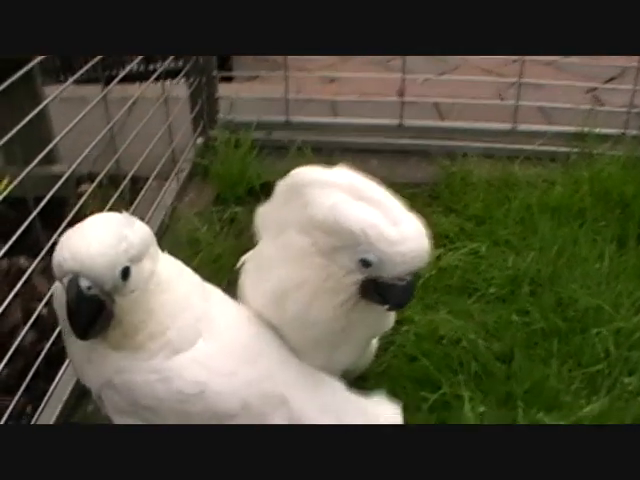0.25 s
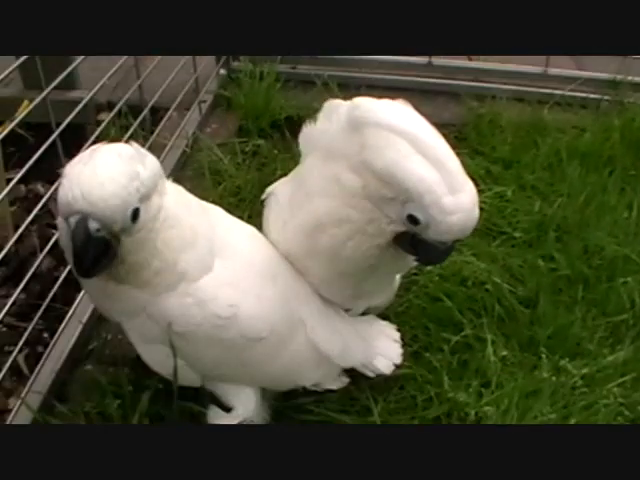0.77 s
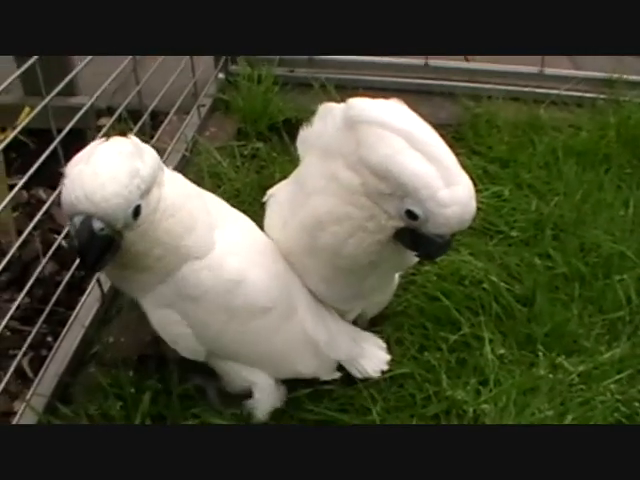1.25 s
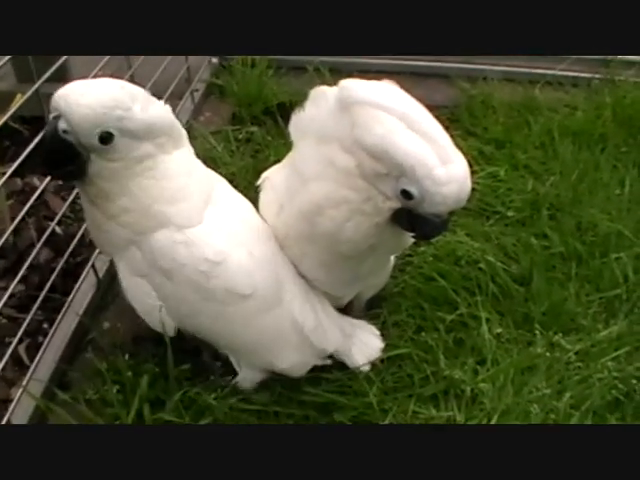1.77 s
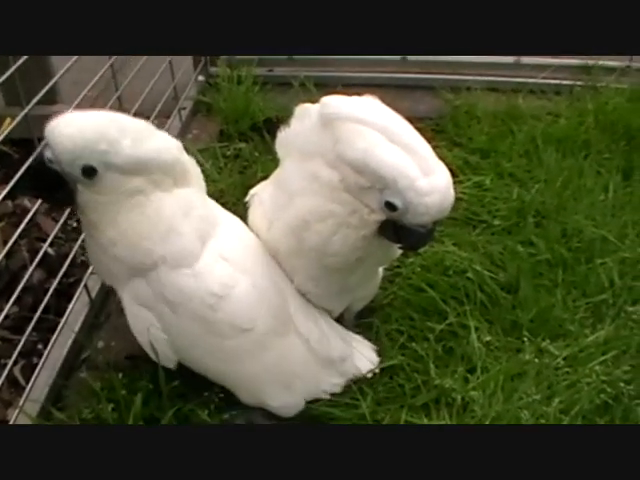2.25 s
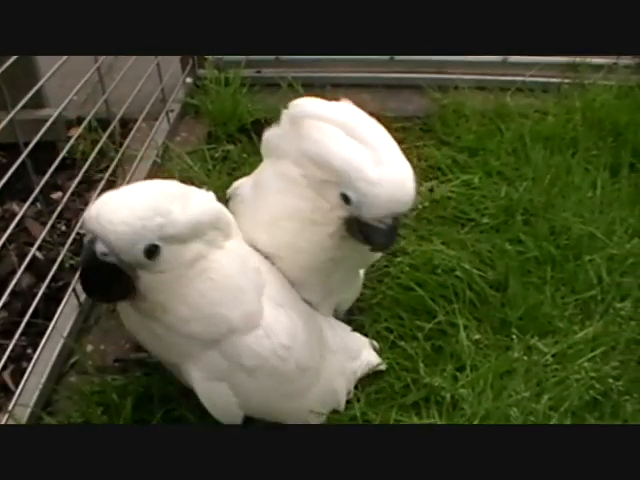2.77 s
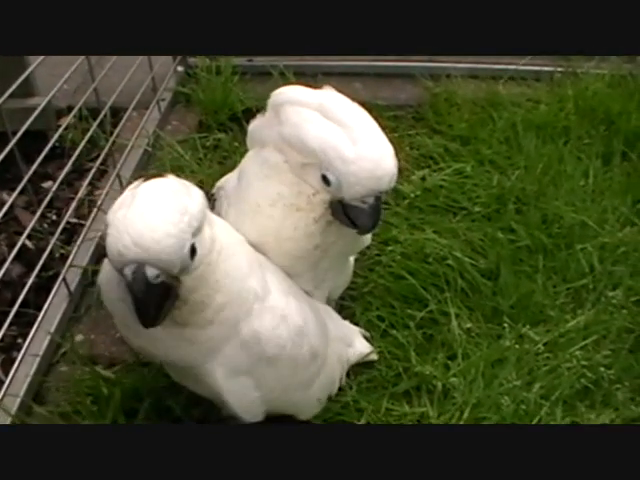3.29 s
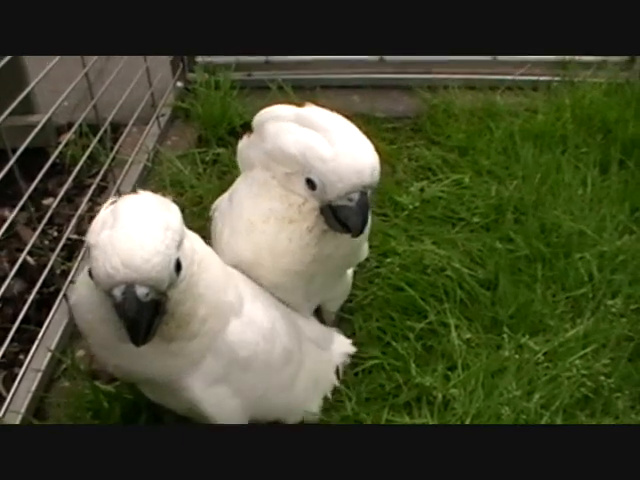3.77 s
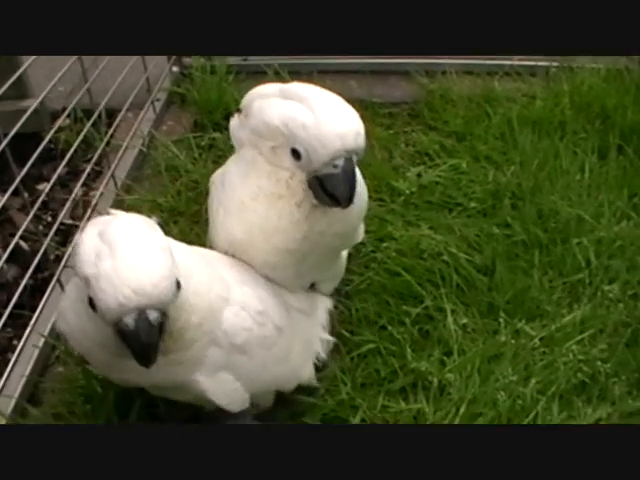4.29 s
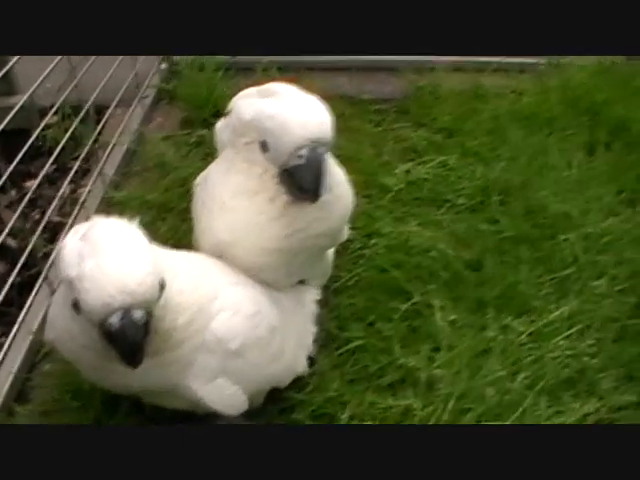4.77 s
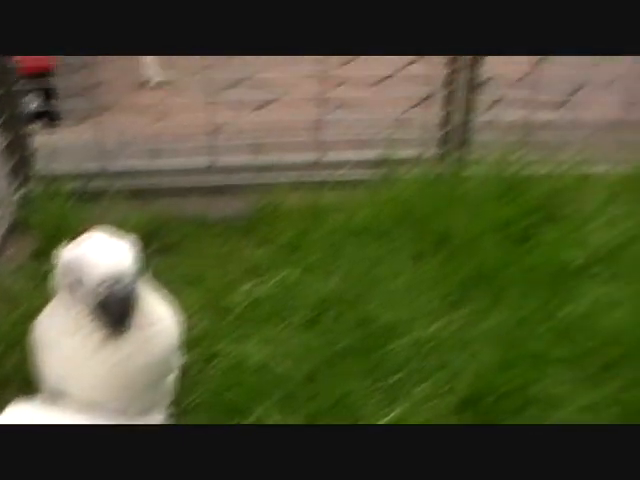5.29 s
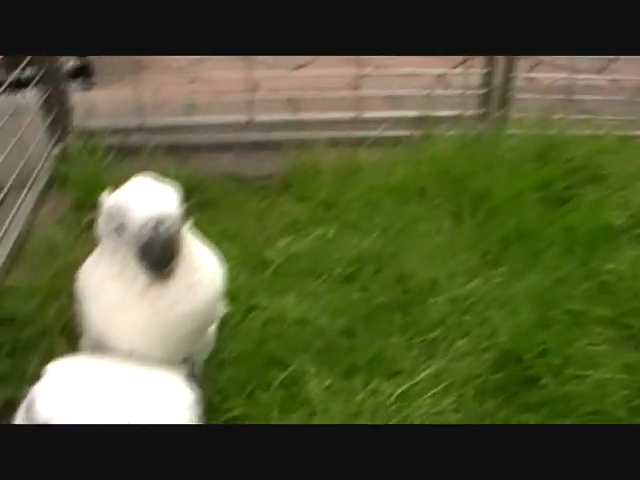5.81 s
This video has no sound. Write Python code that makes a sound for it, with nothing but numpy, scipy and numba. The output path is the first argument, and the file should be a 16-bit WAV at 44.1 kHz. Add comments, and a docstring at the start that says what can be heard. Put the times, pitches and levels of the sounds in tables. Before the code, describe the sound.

Young cockatoos close to the microphone in an outdoor grass pen. Beak clicks and faint feather rustles open over low rumble and soft air. Around the middle a low quiet note breaks into a weak rasp; then come two short harsh squawks, a pause, and two more, each rising from a small grunt, with a slight outdoor echo.

```python
"""Young cockatoos in a wire pen

On grass, close to the microphone: a low note breaks into a rasp, then come two pairs of harsh squawks.
Syrinx pulses and turbulence ring moving throat resonances; squawks start from a grunt and rise as the beak opens.
Noise bursts ring the beak as clicks, swells of hiss are rustling feathers, a hiss band is a thin far-off whistle.
The yard answers with reflections and a tail, over low outdoor rumble and distant air that slowly grows."""
import sys
import numpy as np
from scipy import signal
from scipy.fft import rfft, irfft, next_fast_len
from scipy.io import wavfile
from scipy.ndimage import uniform_filter1d
from numba import njit

SR = 44100
rng = np.random.default_rng(int(sys.argv[2]) if len(sys.argv) > 2 else 0)


def persist_wave(psi):
    """Save psi, clipped to +-1, as 16-bit WAV."""
    counts = np.round(np.clip(psi, -1, 1) * 32767).astype(np.int16)
    wavfile.write(sys.argv[1], SR, np.atleast_2d(counts).T)


N = 266364


def from_db(db):
    """Decibels to amplitude gain."""
    return 10 ** (np.asarray(db) / 20)


def rms_one(x):
    """Scale to an rms of one."""
    return x / np.sqrt(np.mean(x ** 2) + 1e-20)


def at_hz(points, hz):
    """Read a curve on a log-frequency axis."""
    known_hz, values = np.transpose(points)
    return np.interp(np.log(np.maximum(hz, 1)), np.log(known_hz), values)


def cut(x, hz, kind, order=2):
    """Butterworth filter."""
    return signal.sosfilt(signal.butter(order, hz, kind, fs=SR, output="sos"), x)


def waver(n, rate_hz):
    """Random drift with a spread of one: noise kept below the given rate, its first second dropped."""
    return rms_one(cut(rng.standard_normal(n + SR), rate_hz, "low")[SR:])


def ramp(age, length_s):
    """Climb from 0 to 1 in the given time."""
    return np.clip(age / length_s, 0, 1)


def blend(first, last, share):
    """Move from one value to another."""
    return first + (last - first) * share


@njit
def resonate(x, hz, width):
    """A resonance of gain one whose centre may move from sample to sample."""
    r = np.exp(-np.pi * width / SR)
    y = np.zeros(len(x))
    for i in range(2, len(x)):
        drive = (1 - r * r) / 2 * (x[i] - x[i - 2])
        y[i] = drive + 2 * r * np.cos(2 * np.pi * hz[i] / SR) * y[i - 1] - r * r * y[i - 2]
    return y


# likeness of left and right in spread-out noise: f/Hz, correlation (0-1)
LIKENESS = [(50, 0.975), (250, 0.9776), (1000, 0.703), (4000, 0.79), (12000, 0.774)]


def stereo_noise(spectrum):
    """Noise of a given colour, more alike in both channels in the bass than in the treble."""
    size = next_fast_len(N)
    hz = np.arange(size // 2 + 1) * SR / size
    mid, side = rfft(rng.standard_normal((2, size))) * from_db(at_hz(spectrum, hz))
    alike = np.clip(at_hz(LIKENESS, hz), 0, 1)
    channels = np.sqrt(1 + alike) * mid + np.sqrt(1 - alike) * side * [[1], [-1]]
    return rms_one(irfft(channels, size)[:, :N])


# low outdoor background: f/Hz, relative spectral level/dB
RUMBLE_SPECTRUM = [(21, -42), (35, -20), (54, -8), (70, -12.5), (87, -10.5), (136, 1.5), (172, -5),
                   (240, -7.5), (274, -5.5), (301, -10.5), (335, -9), (467, -21.5), (600, -21.5),
                   (780, -25), (1320, -120)]


def rumble():
    """Steady low noise of the open air."""
    return from_db(-47.5) * stereo_noise(RUMBLE_SPECTRUM)


# distant outdoor hiss: f/Hz, relative spectral level/dB
AIR_SPECTRUM = [(290, 2.5), (500, 1), (827, -5.5), (1040, -0.5), (1530, -2), (1990, -6), (2160, -6),
                (3740, -10.5), (4070, -10.5), (5830, -11), (15500, -33)]
AIR_START_DB, AIR_RISE_DB_PER_S = -49.5, 0.85


def air(t):
    """Distant hiss that slowly grows."""
    return from_db(AIR_START_DB + AIR_RISE_DB_PER_S * t) * stereo_noise(AIR_SPECTRUM)


# beak clicks and claw taps near the microphone: t/s, body level before the common gain/dB,
# snap level before the common gain/dB, scrape level relative to each/dB, scrape decay/s,
# widening of the beak's resonances (factor)
CLICKS = [(.158, -27.5, -42.5, -21, 0.0102, 0.49), (0.472, -46, -60.5, -7.5, 0.031, 2.34),
          (0.521, -45.5, -67.5, -9.5, 0.037, 2.1), (0.764, -43, -45.5, -25, 0.0195, 2.65),
          (1.299, -35, -45.5, -8, 0.0755, 3.65), (2.071, -49, -48.5, -7, 0.052, 2.2),
          (3.33, -41, -78, -6.5, 0.076, 1.36), (3.633, -41, -57, -24, 0.0097, 2.5)]
# ringing of the beak: f/Hz, width before widening/Hz, relative level/dB
BEAK_RESONANCES = [(615, 253, -7.5), (1460, 690, -10.5), (2065, 630, -4), (3154, 640, -6), (3456, 176, -20)]
# colour of the snap: f/Hz, relative spectral level/dB
SNAP_SPECTRUM = [(3000, -40), (5000, -4.5), (7500, -4), (10000, -14), (15000, -24.5)]


def clicks(body_gain_db, snap_gain_db, body_decay_s, snap_decay_s):
    """Each click is a brief crunch that rings the beak, with a bright snap and a short scrape after it."""
    body, snap = np.zeros(N), np.zeros(N)
    age = np.arange(SR // 4) / SR
    for start_s, body_db, snap_db, scrape_db, scrape_s, widening in CLICKS:
        span = int(start_s * SR) + np.arange(len(age))
        crunch = rng.standard_normal(len(age))
        ringing = np.zeros(len(age))
        for hz, width, db in BEAK_RESONANCES:
            centre = np.full(len(age), float(hz))
            ringing += from_db(db) * resonate(crunch, centre, float(width * widening))
        scrape = from_db(scrape_db) * np.exp(-age / scrape_s)
        body[span] += from_db(body_db) * (np.exp(-age / body_decay_s) + scrape) * rms_one(ringing)
        snap[span] += from_db(snap_db) * (np.exp(-age / snap_decay_s) + scrape)
    return from_db(body_gain_db) * body + from_db(snap_gain_db) * snap * stereo_noise(SNAP_SPECTRUM)


# reflections from ground, pen and house: delay/s, left level/dB, right level/dB
REFLECTIONS = [(.0031, -47.5, -42.5), (.0087, -10, -9), (.019, -10, -12.5), (.043, -16, -22),
               (.238, -30.5, -31.5)]


def yard(x, t60_s, tail_db, near_t60_s, near_db):
    """A few reflections, quick sideways scatter from the pen and a weaker, longer tail."""
    age = np.arange(SR) / SR
    # opposite in left and right
    sideways = rms_one(rng.standard_normal(SR)) * np.array([[1], [-1]])
    diffuse = rms_one(rng.standard_normal((2, SR)))
    response = np.zeros((2, SR))
    for scatter, db, t60 in ((diffuse, tail_db, t60_s), (sideways, near_db, near_t60_s)):
        # dividing by the decay's own energy lets db set the total level
        response += scatter * from_db(db - 60 * age / t60) / np.sqrt(t60 * SR / np.log(1e6))
    for delay_s, left_db, right_db in REFLECTIONS:
        response[:, int(delay_s * SR)] += from_db([left_db, right_db])
    return signal.fftconvolve(x, response, axes=1)[:, :N]


# a thin far-off whistle: start t/s, length/s, level/dB
WHISTLES = [(0.415, 0.378, -59.5), (1.059, 0.25, -59.5)]
WHISTLE_HZ, WHISTLE_EDGE_S = 5706, 0.023


def whistle(t):
    """A narrow band of hiss that fades in, holds and fades out."""
    level = np.zeros(N)
    for start_s, length_s, db in WHISTLES:
        fade_in = ramp(t - start_s, WHISTLE_EDGE_S)
        fade_out = ramp(start_s + length_s - t, WHISTLE_EDGE_S)
        level += from_db(db) * fade_in * fade_out
    band = [WHISTLE_HZ - 250, WHISTLE_HZ + 250]
    return level * rms_one(cut(rng.standard_normal(N), band, "band"))


# feathers brushing: peak t/s, length between the 1/e points/s, peak level/dB
RUSTLES = [(0.567, 0.04, -55), (0.768, 0.116, -54.5), (1.045, 0.051, -55), (1.131, 0.188, -55),
           (1.258, 0.084, -51), (1.666, 0.064, -58.5), (1.742, 0.073, -56.5), (1.953, 0.086, -56),
           (2.217, 0.045, -55), (3.035, 0.064, -53), (3.35, 0.205, -65.5), (5.044, 0.079, -54),
           (5.32, 0.152, -54.5)]
# colour of the brushing: f/Hz, relative spectral level/dB
FEATHER_SPECTRUM = [(2500, -7.5), (5500, -5), (8000, -1.5), (11000, -8), (15000, -16.5)]


def feathers(t):
    """Each brush is a soft swell of fine hiss."""
    swell = np.zeros(N)
    for peak_s, length_s, db in RUSTLES:
        swell += from_db(db) * np.exp(-(2 * (t - peak_s) / length_s) ** 2)
    return swell * stereo_noise(FEATHER_SPECTRUM)


def syrinx(pitch, rough, jitter, shimmer_db, rasp):
    """One pulse a cycle; roughness unsettles timing and strength and adds turbulence after each pulse."""
    n = len(pitch)
    wobble = waver(n, 260)
    phase = np.cumsum(pitch * np.exp(jitter * rough ** 2 * wobble)) / SR
    at = np.flatnonzero(np.diff(np.floor(phase)))
    pulses = np.zeros(n)
    pulses[at] = from_db(shimmer_db * rough[at] * np.clip(rng.standard_normal(len(at)), -2, 2))
    turbulence = rng.standard_normal(n) * np.exp(-2.5 * (phase % 1))
    return rms_one(pulses) + rasp * rough * rms_one(turbulence)


def throat_filter(source, throat, closing_hz, hollow_hz, rough, flutter, flutter_db):
    """Steep resonances that sink as the beak closes and flutter when the voice is rough."""
    # a little of the source passes without ringing
    voice = from_db(-24) * cut(cut(source, 5300, "low"), 500, "high")
    for hz, width, db in throat:
        # the upper resonances travel further
        centre = hz - closing_hz * (hz / 1700) ** 0.2
        centre = centre * (1 + flutter * rough * waver(len(source), 111))
        gain = from_db(db + flutter_db * rough * waver(len(source), 71.5))
        once = resonate(source, centre, float(width))
        voice += gain * resonate(once, centre, float(width))
    # the mouth cavity swallows one band
    voice -= resonate(voice, hollow_hz, 1530.0)
    return cut(voice, 10080, "low", order=4)


ATTACK_S = 0.0099
# by register (low, middle, high): the bass lingers, and each takes its share of the swell
FADE_DB_PER_S, SWELL_SHARES = (277.5, 404, 401.5), (.2, 1, 0.86)
GRUNT_COLOUR_DB = (-1, -12, -20)   # by register
GRUNT_GROWTH_DB = 15.5   # crescendo towards the attack


def gate(age, length_s, fade_db_per_s):
    """Gain of a note: quick attack, hold, then a steady fall in dB."""
    return ramp(age, ATTACK_S) * from_db(-fade_db_per_s * np.maximum(age - length_s, 0))


def register_gains(age, loudness, opening):
    """Gains of the low, middle and high registers through grunt, swell, hold and trailing note."""
    (_, length_s, swell_s, swell_db, low_db, middle_db, high_db,
     bass_loss_db, grunt_s, grunt_db, trail_s, trail_db) = loudness
    levels_db = (low_db - bass_loss_db * opening, middle_db, high_db)
    gains = []
    for db, share, fade, colour_db in zip(levels_db, SWELL_SHARES, FADE_DB_PER_S, GRUNT_COLOUR_DB):
        trail = from_db(trail_db) * gate(age, length_s + trail_s, fade)
        note = np.maximum(gate(age, length_s, fade), trail)
        note = note * from_db(db - share * swell_db * (1 - ramp(age, swell_s)))
        growth_db = -GRUNT_GROWTH_DB * ramp(-age, grunt_s) ** 2
        grunt = gate(age + grunt_s, grunt_s, fade) * from_db(grunt_db + colour_db + growth_db)
        gains.append(np.hypot(note, grunt))
    return gains


REGISTER_EDGES_HZ = (1600, 4200)
PITCH_LEAD = .8   # pitch follows the opening to this power, so it rises ahead of it
GRUNT_SINK_HZ = 329   # further fall of the throat resonances in the grunt, as at 1700 Hz
GRUNT_GLIDE_S, GRUNT_ROUGHNESS = .022, .66   # the hoarse grunt slides into the call
TRAIL_SMOOTHING = .3   # share of the roughness lost once the bird stops pushing
QUAVER, QUAVER_HZ = .006, 29.83   # unsteadiness of a young voice: share of the pitch, fastest rate
DOUBLING = .9   # strong and weak cycles alternate by this share at full roughness


def squawk(loudness, gesture, throat):
    """Rough pulses ring the throat; pitch and resonances move as the beak opens, and roughness shifts."""
    start_s, length_s, *_, grunt_s, _, trail_s, _ = loudness
    (open_s, grunt_hz, first_hz, top_hz, first_rough, full_rough,
     sink_hz, closed_hollow_hz, open_hollow_hz) = gesture
    # the span leaves room for a 60 dB fade
    end_s = start_s + length_s + trail_s + 60 / min(FADE_DB_PER_S)
    span = np.arange(int((start_s - grunt_s) * SR), min(int(end_s * SR), N))
    age = span / SR - start_s
    opening = np.sin(np.pi / 2 * ramp(age, open_s)) ** 2
    push = gate(age, length_s, max(FADE_DB_PER_S))
    grunting = 1 - np.exp(np.minimum(age, 0) / GRUNT_GLIDE_S)
    tension = opening ** PITCH_LEAD

    pitch = blend(blend(first_hz, top_hz, tension), grunt_hz, grunting)
    pitch = pitch * np.exp(QUAVER * waver(len(span), QUAVER_HZ))
    rough = blend(first_rough, full_rough * (1 - TRAIL_SMOOTHING * (1 - push)), tension)
    rough = blend(rough, GRUNT_ROUGHNESS, grunting)
    closing_hz = sink_hz * (1 - opening) + GRUNT_SINK_HZ * grunting
    hollow_hz = blend(closed_hollow_hz, open_hollow_hz, opening)

    source = syrinx(pitch, np.clip(rough, 0, 1), jitter=.16, shimmer_db=5.5, rasp=.75)
    source = source * (1 + DOUBLING * rough * np.cos(np.pi * np.cumsum(pitch) / SR))
    voice = throat_filter(source, throat, closing_hz, hollow_hz, rough, flutter=.018, flutter_db=2.5)
    # the fundamental leaks through the neck, better at high pitch
    fundamental = resonate(resonate(source, pitch, 220.0), pitch, 210.0)
    voice += from_db(-11) * cut(fundamental, 387, "high", order=6)

    low, below_high = [signal.sosfiltfilt(signal.butter(4, hz, fs=SR, output="sos"), voice)
                       for hz in REGISTER_EDGES_HZ]
    registers = (low, below_high - low, voice - below_high)
    out = np.zeros(N)
    for register, gain in zip(registers, register_gains(age, loudness, opening)):
        # each register is levelled first, so its gain sets the loudness
        level = np.sqrt(uniform_filter1d(register ** 2, size=700) + 1e-12)
        out[span] += gain * register / level
    return out


# loudness of each call: start t/s, length/s, swell length/s, swell before register share/dB,
# low, middle and high register level/dB (low before bass loss), bass lost as the beak opens/dB,
# grunt length/s, grunt level before register colour/dB, trailing note length/s, its relative level/dB
LOUDNESS = [ (2.345, 0.0492, 0.0383, 4, -25, -28.5, -36.5, 11.5, 0.01614, -31.5, 0.069, -6),
            (2.457, 0.1899, .015, 4, -34.5, -37, -44, 3.5, .04, -48.5, .03, -11.5),
            (4.116, 0.11565, 0.0786, 14, -27, -18, -26, 3, .15, -36, 0.0456, -14.5),
            (4.435, 0.10695, 0.051, 13, -25, -15.5, -24, 6.5, 0.0653, -31.5, 0.25, -30.5),
            (5.366, 0.10796, 0.0673, 11.5, -28.5, -17, -29.5, 1, .02, -42, .1, -25.5),
            (5.686, 0.1189, 0.0422, 10.5, -20.5, -16, -26.5, 13.5, .024, -27.5, 0.0524, -8)]
# voice of each call: beak opening time/s, grunt f/Hz, first f/Hz, top f/Hz, first roughness (0-1),
# full roughness (0-1), fall of the throat resonances with the beak closed, as at 1700 Hz/Hz,
# antiresonance of the mouth closed f/Hz, open f/Hz
GESTURES = [ (.13, 360, 310, 360, .1, 0.6, 9.5, 6490, 7140), (.12, 360, 400, 450, .7, .95, 8.9, 5840, 5924),
            (.16, 290, 420, 555, .6, .76, 331, 2693, 3547),
            (.095, 275, 405, 542, .52, .48, 523, 3170, 6220),
            (.065, 400, 415, 512, .4, .65, 346, 8600, 8140),
            (.12, 310, 396, 462, .32, .82, 487, 5700, 9520)]
# throat and beak resonances of each call, wide open: f/Hz, width of each of two passes/Hz, relative level/dB
THROATS = [
    [(656, 209, 12), (1278, 168, 12.5), (2100, 250, 0), (2592, 300, 0), (3484, 620, -4), (4768, 266, -4),
     (5400, 310, -9.5), (6170, 850, -12), (8070, 320, -17.5)],
    [(875, 800, 5.5), (1180, 540, -6.5), (2054.3, 86, 8.5), (2774, 160, -10.5), (3391, 128, -4.5),
     (3964, 610, -17), (5240, 300, -5), (6340, 520, -31.5), (8360, 400, -25)],
    [(1167, 523, 2.5), (1400, 800, -21.5), (1928, 516, -7), (2900, 292, -7.5), (4188, 420, -12.5),
     (5470, 610, -9), (6720, 183, -10), (7540, 1620, -19.5), (9320, 2070, -28.5)],
    [(1183, 696, 7.5), (1681.3, 226, 2), (2161, 384, 6.5), (2834, 625, 6), (3314, 900, 0),
     (4680, 324, -2.5), (6133, 500, 0), (8250, 203, -12), (12500, 1250, -22.5)],
    [(1088.3, 503, 9), (1408, 89, -1.5), (2228, 334, 5), (3114, 420, -3), (3426, 450, 1),
     (4965, 2000, -0.5), (6710, 346, -2.5), (8616, 815, -3.5), (11400, 9300, -19.5)],
    [(1238, 665, 12.5), (1747, 234, -4), (2190, 506, 7.5), (3073, 492, 3), (3581, 211, 2.5),
     (4500, 246, -36), (5215, 610, -5), (8280, 340, -22), (9244, 160, -11.5), (12700, 870, -29)],
]


def squawks():
    """All calls, each with its own loudness, gesture and throat."""
    return sum(squawk(*call) for call in zip(LOUDNESS, GESTURES, THROATS))


def scene():
    """The birds in their pen, close to the microphone, over the outdoor background."""
    t = np.arange(N) / SR
    background = rumble() + air(t)
    beaks = clicks(body_gain_db=-0.5, snap_gain_db=5.5, body_decay_s=0.00333, snap_decay_s=0.0058)
    # the calls sit slightly to the right
    birds = squawks() * from_db([[-.6], [.6]]) + beaks
    answer = yard(birds, t60_s=0.643, tail_db=-16.5, near_t60_s=0.0274, near_db=-8.5)
    return birds + answer + whistle(t) + feathers(t) + background


def record(dry):
    """The microphone sheds the deepest bass, the highest peaks are rounded and the top is cut."""
    rounded = 1.2952 * np.tanh(cut(dry, 40.6, "high", order=3) / 1.2867)
    top_cut = signal.ellip(10, .1, 90, 15900, fs=SR, output="sos")
    return signal.sosfilt(top_cut, rounded)


dry = scene()
out = record(dry)
persist_wave(out)
```